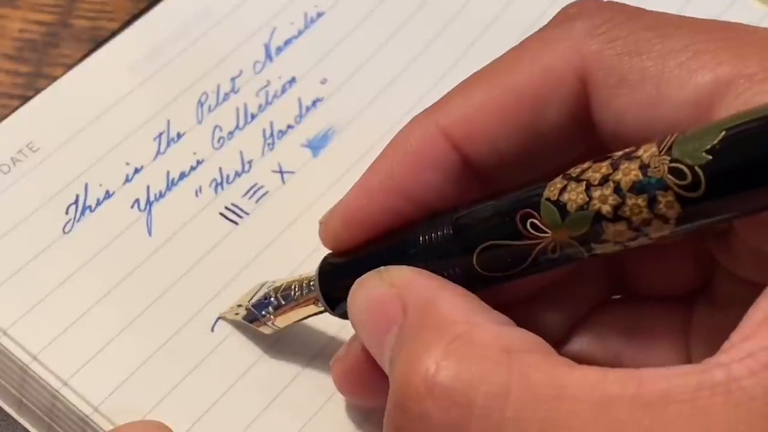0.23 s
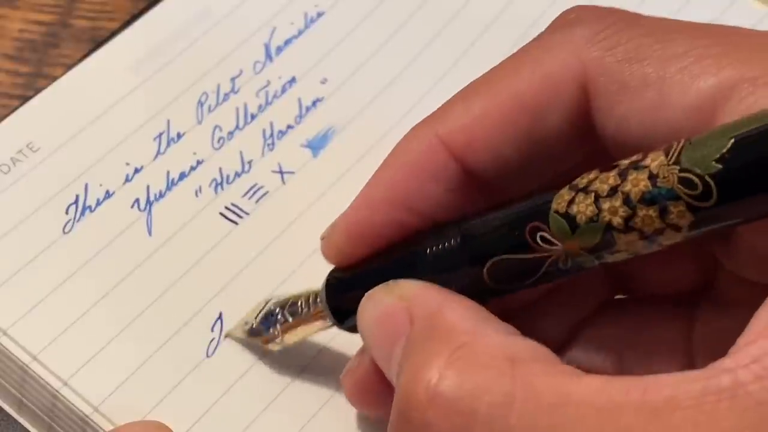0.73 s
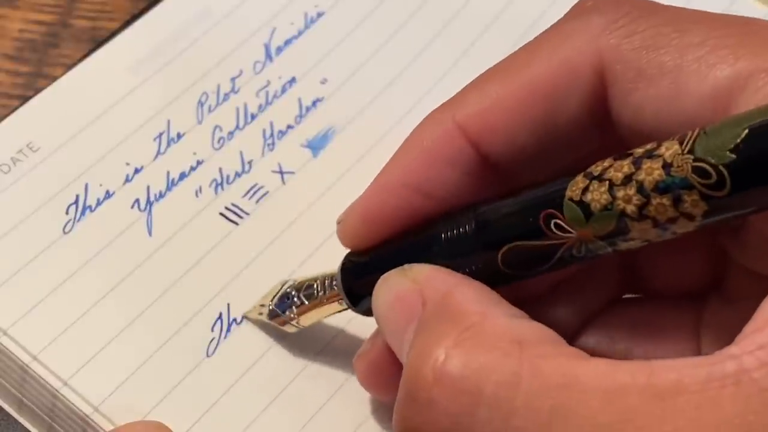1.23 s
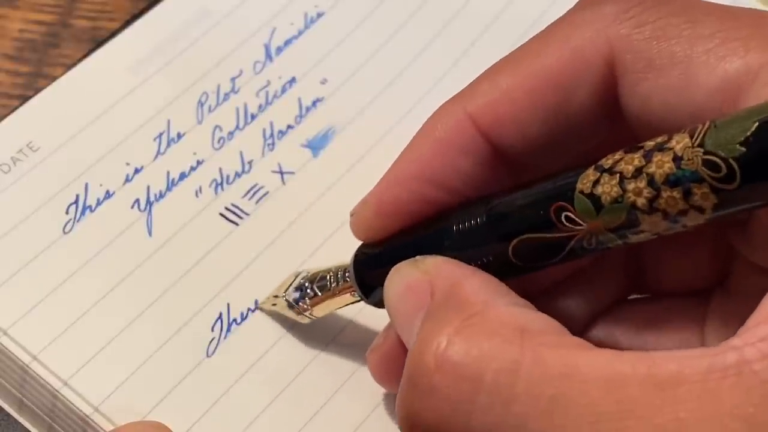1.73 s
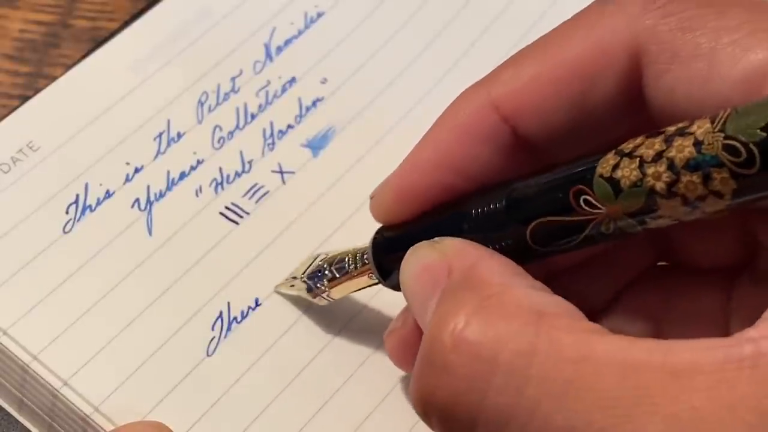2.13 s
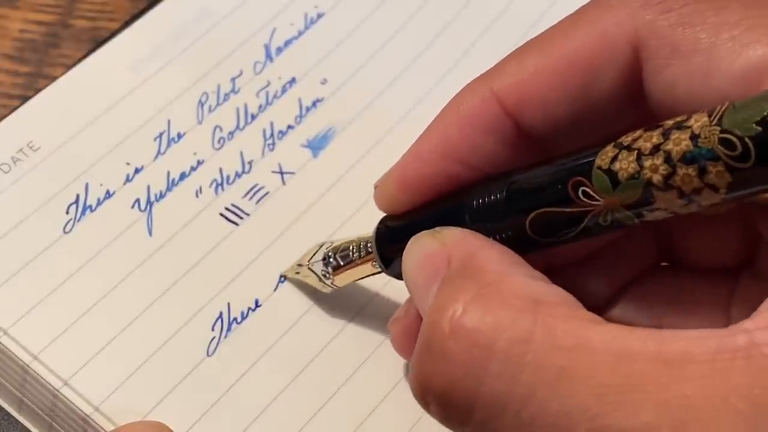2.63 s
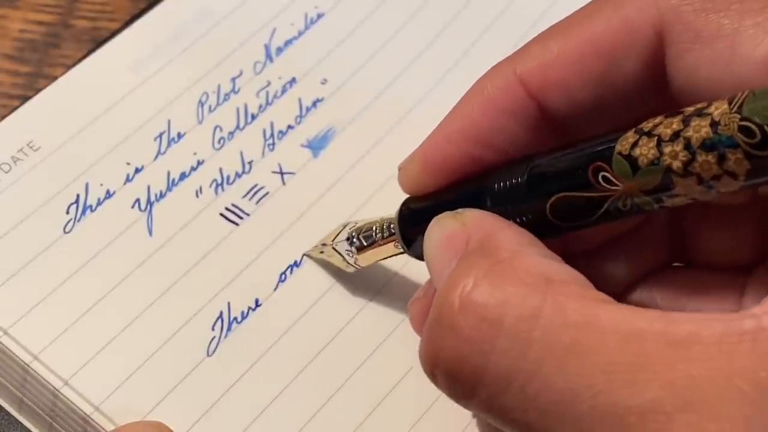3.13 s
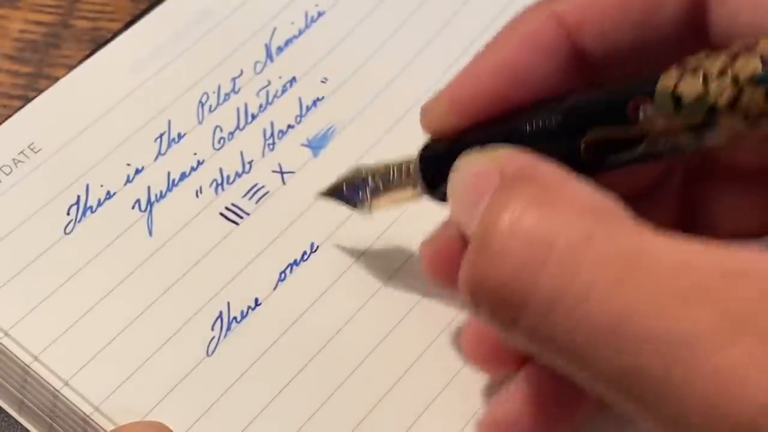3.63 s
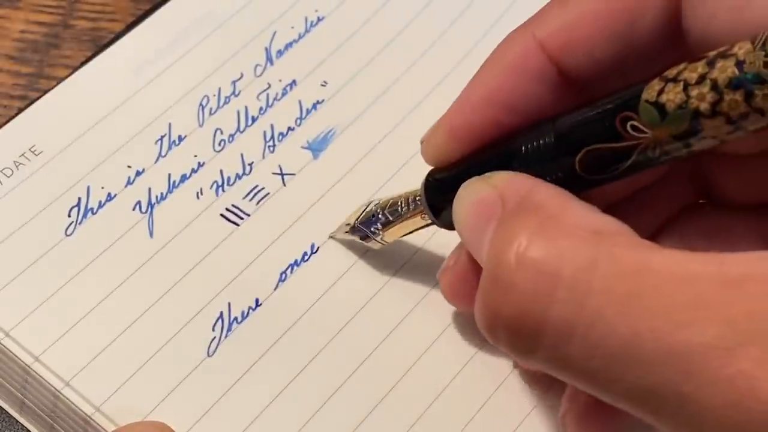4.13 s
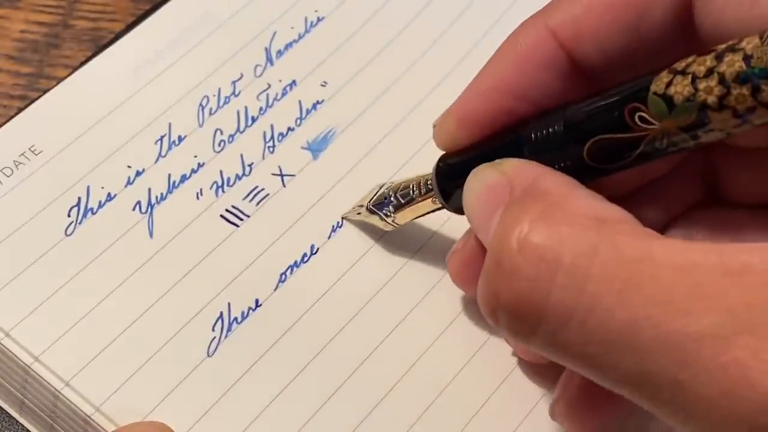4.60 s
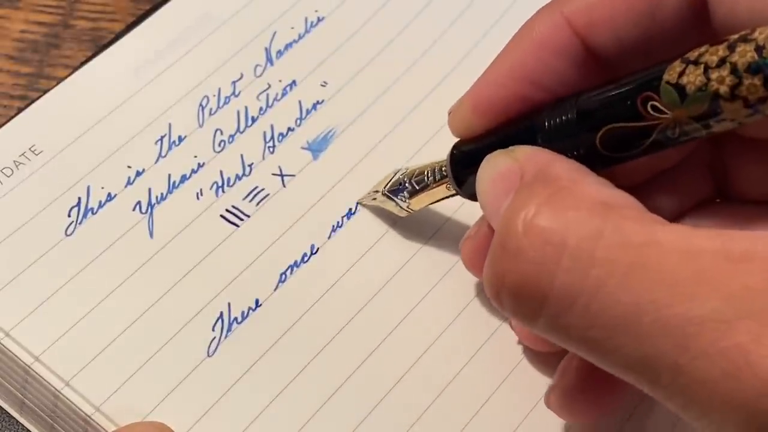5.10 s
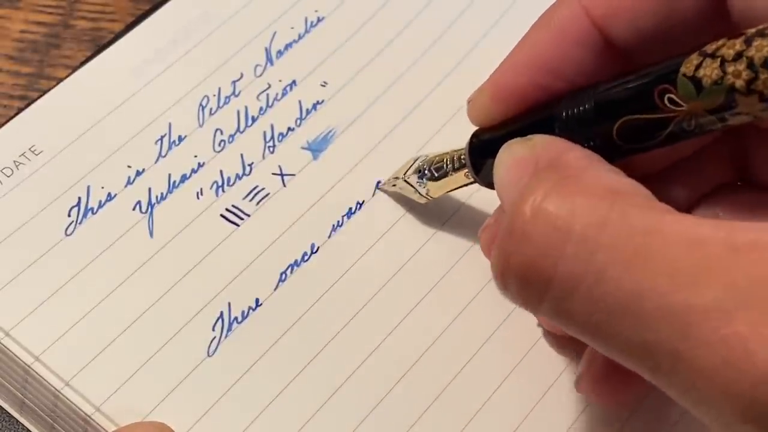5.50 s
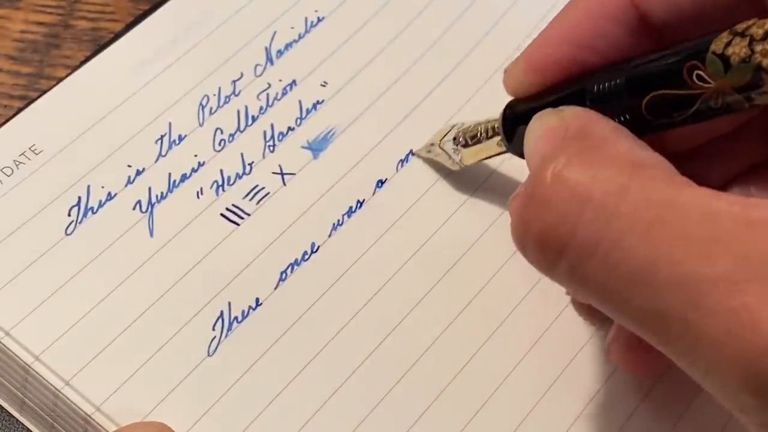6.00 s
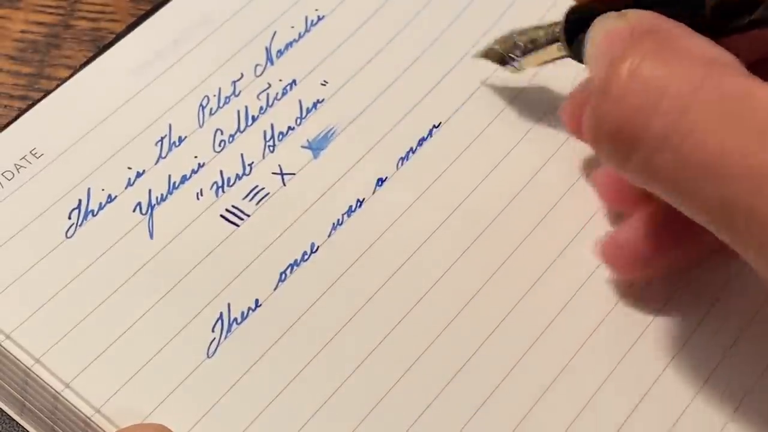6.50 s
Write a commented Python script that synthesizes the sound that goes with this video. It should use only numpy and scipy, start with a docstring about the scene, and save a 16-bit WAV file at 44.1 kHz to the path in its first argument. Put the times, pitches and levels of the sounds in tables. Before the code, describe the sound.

A metal pen nib scratches softly across notebook paper in short strokes over a steady low hum, then briefly dips and continues at double speed.

```python
"""On a desk in a quiet room with a steady hum, a fountain pen writes a line in a notebook.
Each stroke drags the nib over paper fibres: pad and barrel sound low, the nib sings near 5 kHz.
The hand slides over the page in short hisses and knocks softly on the pad; one faint squeak falls in pitch.
Near the end the sound fades for an instant and goes on at double speed, so everything is an octave higher."""
import sys
import numpy as np
from scipy import signal
from scipy.fft import rfft, irfft
from scipy.io import wavfile

SR = 44100
rng = np.random.default_rng(int(sys.argv[2]) if len(sys.argv) > 2 else 0)


def waveform_to_disk(signal):
    """Save audio, clipped to [-1, 1], as 16-bit WAV at the path in sys.argv[1]."""
    frames = np.transpose(np.atleast_2d(signal))
    scaled = np.clip(frames, -1, 1) * 32767
    samples = np.round(scaled).astype(np.int16)
    wavfile.write(sys.argv[1], SR, samples)


N = 297675  # length in samples
TIME = np.arange(N) / SR  # s
FREQ = np.fft.rfftfreq(N, 1 / SR)  # Hz

# In every function, speed is the playing speed: 1 is normal, 2 is double.
# Pitches and widths in the tables are those at normal speed; times are those of the finished sound.


def amp(db):
    """Turns decibels into a gain."""
    return 10 ** (np.asarray(db) / 20)


def unit(x):
    """Scales a signal to an rms level of 1."""
    return x / np.sqrt(np.mean(x ** 2) + 1e-30)


def colour(x, points, speed):
    """Filters by a curve drawn through (Hz, dB) points, moved up by the playing speed."""
    hz, db = np.transpose(points)
    curve_db = np.interp(np.log(FREQ / speed + 1), np.log(hz + 1), db)
    return irfft(rfft(x) * amp(curve_db), N)


def wander(rate_hz):
    """Slow random motion with an rms of 1: noise with its fast part removed."""
    slow = rfft(rng.standard_normal(N)) * np.exp(-(FREQ / rate_hz) ** 2)
    return unit(irfft(slow, N))


def ring(x, modes, speed, bend=1):
    """Sum of steep resonances, rows of (Hz, width Hz, dB); bend is a moving factor on their pitch."""
    out = np.zeros(N)
    clock = np.cumsum(speed * bend * np.ones(N)) / SR
    for hz, width_hz, db in modes:
        turn = np.exp(2j * np.pi * hz * clock)
        r = np.exp(-np.pi * width_hz * speed / SR)
        # shift the pitch down to zero, smooth there, then shift back up
        shifted = x / turn + 1e-18
        smooth = signal.lfilter([(1 - r) ** 2], [1, -2 * r, r * r], shifted)
        out += amp(db) * 2 * (turn * smooth).real
    return out


def arch(middle_s, length_s):
    """Speed of one movement of the hand: it starts, peaks at 1 and stops."""
    times = middle_s + length_s * np.linspace(-.5, .5, 65)
    return np.sqrt(np.interp(TIME, times, np.hanning(65)))


def fibres(speed, per_s, share, patchy_db):
    """Friction force: fine rubbing plus small snags on single fibres, in patches of rougher paper."""
    snags = rng.standard_normal(N) * (rng.random(N) < per_s * speed / SR)
    share = np.clip(share, 0, 1)  # part of the power that comes from snags
    force = np.sqrt(share) * unit(snags) + np.sqrt(1 - share) * rng.standard_normal(N)
    return unit(force * amp(patchy_db * wander(70 * speed)))


def room(speed):
    """Steady beating hum of the mains and of motors just below it, over soft ventilation rumble and hiss."""
    # The hum's tones. Each row: pitch in Hz, rms level in dB.
    hum_tones = [(43, -62), (54.6, -67), (58.6, -67), (87.5, -76), (117.1, -72), (119.96, -49.6),
                 (177, -83), (229.5, -82), (236.8, -70.5), (239.92, -73.5), (254, -84), (295, -86),
                 (414, -88), (473.6, -84), (492.5, -90)]
    # Ventilation noise. Each row: pitch in Hz, level in dB per Hz at normal speed.
    air_curve = [(14, -72), (30, -78.5), (54, -74), (70, -86), (120, -81), (160, -96.5), (235, -92.5),
                 (280, -100), (360, -99), (440, -104.5), (620, -109), (1400, -115.5), (2600, -118.5),
                 (6000, -121), (15500, -124.7)]
    hum = np.zeros(N)
    for hz, db in hum_tones:
        hum += amp(db) * np.sqrt(2) * np.sin(2 * np.pi * (hz * speed * TIME + rng.random()))
    # double speed spreads the same power over twice the band
    air = colour(rng.standard_normal(N), air_curve, speed) * np.sqrt(SR / 2 / speed)
    return hum + air


def squeak():
    """A faint squeak: noise through one narrow resonance that falls in pitch."""
    middle_s, length_s, level_db = 2.02, .17, -88
    middle_hz, fall_hz_per_s, width_hz = 4390, 2200, 110
    hz = middle_hz - fall_hz_per_s * np.clip(TIME - middle_s, -length_s, length_s)
    tone = unit(ring(rng.standard_normal(N), [(1, width_hz, 0)], 1, hz))
    return amp(level_db) * arch(middle_s, length_s) * tone


def knocks(speed):
    """Brief dull blows of pen and hand on the pad, which die at once in the stack of paper."""
    # The blows. Each row: time in seconds, level at the start in dB.
    blow_list = [(.378, -63), (0.683, -70), (3.556, -65), (3.63, -60), (3.695, -50), (3.857, -62.5),
                 (5.224, -70), (5.401, -66), (5.62, -69), (6.265, -64), (6.49, -49.5), (6.668, -64)]
    decay_s = 0.0035  # at normal speed
    dull = [(200, -22), (450, 0), (750, 3), (1800, 0), (2600, -13), (9000, -28)]  # (Hz, dB)
    thud = unit(colour(rng.standard_normal(N), dull, speed))
    blows = np.zeros(N)
    for start_s, db in blow_list:
        blows[round(start_s * SR)] = amp(db)
    return thud * signal.lfilter([1], [1, -np.exp(-speed / (decay_s * SR))], blows)


def hand(speed):
    """The side of the hand brushes along the page: fine friction makes short, smooth hisses."""
    # Slides of the hand. Each row: middle in seconds, length in seconds, level in dB, tilt in dB per octave.
    slides = [(1.814, 0.1, -70.5, -1.5), (1.875, .08, -76, -2.5), (1.91, 0.071, -71.5, -0.7),
              (3.698, 0.16, -61, -0.2), (5.267, 0.064, -69.5, -1.8), (5.658, 0.059, -64.5, -1.5),
              (6.508, 0.087, -57.5, -1.3)]
    # Skin on paper, before the tilt. Each row: pitch in Hz, relative level in dB.
    skin_curve = [(200, 6), (400, 3), (800, 0), (1100, 1.5), (1600, 3.5), (2600, 1), (4000, 4), (6500, 3.5),
                  (8000, -1.5), (11000, -3.5), (13000, -9), (16000, -21)]
    rub = fibres(speed, per_s=3000, share=.3, patchy_db=.6)
    out = np.zeros(N)
    for middle_s, length_s, db, tilt_db in slides:
        tilted = [(hz, level + tilt_db * np.log2(hz)) for hz, level in skin_curve]
        hiss = unit(colour(rub, tilted, speed))
        out += amp(db) * arch(middle_s, length_s) ** 1.2 * hiss
    return out


def glide(speed):
    """Light, wavering drag that joins the strokes for as long as the nib stays on the paper."""
    # Words, with the nib on the paper throughout. Each row: pen down in seconds, pen up in seconds.
    words = [(.08, .56), (.73, 1.79), (2.32, 3.6), (4.17, 5.14), (5.39, 5.64), (5.77, 6.2)]
    level_db, waver_db = -93, 4
    waver_hz, landing_s = 6.6, 0.024  # at normal speed
    contact = np.zeros(N)
    for down_s, up_s in words:
        nearest_end_s = np.minimum(TIME - down_s, up_s - TIME)
        contact += np.clip(nearest_end_s * speed / landing_s, 0, 1)
    return contact * amp(level_db + waver_db * wander(waver_hz * speed))


def small_strokes(speed):
    """Fills each run of small letters with down- and upstrokes in an even beat; downstrokes lean on the pad."""
    # Runs of letters. Each row: first stroke in seconds, last stroke in seconds, drag in dB before unevenness.
    runs = [(1.056, 1.349, -85.5), (2.468, 2.53, -80.5), (2.894, 3.1, -84), (3.314, 3.502, -79.5),
            (4.806, 4.883, -79), (4.976, 5.057, -81), (5.519, 5.629, -80), (5.789, 5.916, -77),
            (5.966, 6.046, -77), (6.147, 6.201, -81), (6.274, 6.369, -78.5)]
    beat_s, stroke_s = .088, 0.07  # rough time between strokes and length of one, at normal speed
    down_pad_db, up_pad_db, up_drag_db, uneven_db = 7, 5.5, 0.2, 1.5
    rows = []
    for first_s, last_s, drag_db in runs:
        beats = max(round((last_s - first_s) * speed / beat_s), 1)
        for k, middle_s in enumerate(np.linspace(first_s, last_s, beats + 1)):
            extra_db, pad_db = (up_drag_db, up_pad_db) if k % 2 else (0, down_pad_db)
            stroke_db = drag_db + extra_db + uneven_db * rng.standard_normal()
            rows.append((middle_s, stroke_s / speed, stroke_db, pad_db))
    return rows


def pen(speed):
    """Friction drives pad, barrel and nib; the barrel's pitch shifts as the grip changes."""
    # Bold strokes of capitals, loops and first letters. Each row: middle in seconds, length in seconds,
    # drag in dB, weight on the pad in dB relative to the drag.
    bold_strokes = [(0.12, .093, -79.5, -3), (0.384, 0.057, -69, 3), (0.425, 0.088, -66.5, -4),
                    (0.495, 0.074, -71, 5.5), (0.787, .1, -70, 9), (0.929, .09, -70.5, 3),
                    (1.418, 0.073, -77.5, 4.5), (1.634, 0.085, -77, 0), (1.73, 0.067, -81.5, 2),
                    (2.37, 0.096, -76, 9.5), (2.7, 0.067, -78, 9), (3.38, 0.07, -74.5, 10.5),
                    (3.56, 0.053, -75, 8.5), (4.244, 0.069, -75.5, 9), (4.414, 0.069, -79.5, 8),
                    (4.546, .11, -80.5, 9), (4.68, .11, -81, 9), (5.23, .032, -76.5, 13.5),
                    (5.411, .043, -74, 10), (6.443, 0.099, -79.5, -3), (6.684, 0.059, -69, 9.5),
                    (6.699, 0.04, -65.5, 1), (6.751, .049, -57, -13)]
    # The pad's note depends on where the nib presses. Each row: time in seconds, pitch in Hz.
    pad_notes = [(0, 514), (.39, 580), (.48, 470), (.92, 502), (2.38, 420), (3.39, 484), (4.25, 455),
                 (6.75, 462)]
    # Resonances of the barrel. Each row: pitch in Hz, width in Hz, relative level in dB.
    barrel_modes = [(630, 160, -3.5), (1038, 160, -3), (1332, 234, 0), (1857, 290, -3.5), (2423, 180, -9),
                    (2990, 500, -17.5)]
    # Resonances of the nib. Each row: pitch in Hz, width in Hz, relative level in dB.
    nib_modes = [(4270, 700, -2), (4910, 600, 2), (5000, 200, -1.5), (6640, 1100, -17.5), (8350, 820, -8)]
    # Dry friction of nib on paper. Each row: pitch in Hz, relative level in dB.
    friction_curve = [(150, -22), (300, 2), (600, 2), (1500, -9), (3000, -8), (6000, -12), (10000, -22),
                      (16000, -27)]
    pad_db, dry_db, nib_db = 0.85, -4, 0.8  # levels of the layers beside the barrel's 0 dB
    glide_pad_db, glide_ring_db = 3.5, 1  # pad and nib while gliding, relative to the drag
    ring_db, firm_db = -7.5, -75.5  # nib relative to a firm drag, and that drag
    ring_growth = 0.99  # dB of nib ring per dB of drag

    # three powers over time: drag moves barrel and paper, weight the pad, sing the nib
    drag = glide(speed) ** 2
    weight = drag * amp(glide_pad_db) ** 2
    sing = drag * amp(glide_ring_db) ** 2
    for middle_s, length_s, drag_db, weight_db in bold_strokes + small_strokes(speed):
        power = (amp(drag_db) * arch(middle_s, length_s)) ** 2
        drag += power
        weight += power * amp(weight_db) ** 2
        sing += power * amp(ring_db + (ring_growth - 1) * (drag_db - firm_db)) ** 2

    force = fibres(speed, per_s=500, share=.55, patchy_db=1.8)
    note_hz = np.interp(TIME, *np.transpose(pad_notes))
    # a resonance at 1 Hz, 185 Hz wide, bent up to the moving note
    pad = amp(pad_db) * unit(ring(force, [(1, 185, 0)], speed, note_hz))
    grip = 1 + .015 * wander(4 * speed)
    barrel = unit(ring(force, barrel_modes, speed, grip))
    scratch = fibres(speed, per_s=900, share=0.42, patchy_db=1.5)
    dry_rub = amp(dry_db) * unit(colour(scratch, friction_curve, speed))
    nib = amp(nib_db) * unit(ring(force, nib_modes, speed))
    return np.sqrt(weight) * pad + np.sqrt(drag) * (barrel + dry_rub) + np.sqrt(sing) * nib


def desk(speed):
    """Adds up room, knocks, hand and pen at one playing speed."""
    return room(speed) + knocks(speed) + hand(speed) + pen(speed)


def scene():
    """Normal speed, with the squeak, fades out; then double speed fades in."""
    speed_up_s, fade_s = 5.172, .048  # moment of silence, and length of the fade on each side
    fade = np.clip((TIME - speed_up_s) / fade_s, -1, 1)
    gain = np.sin(np.pi / 2 * abs(fade)) ** 2
    normal = desk(1) + squeak()
    double = desk(2)
    return (gain * np.where(fade < 0, normal, double))[None]


def record(dry):
    """Removes everything above the band limit with a steep low-pass filter."""
    edge_hz = 15720
    low_pass = signal.firwin(1023, edge_hz, window=("kaiser", 9), fs=SR)
    return signal.oaconvolve(dry, low_pass[None], "same")


dry = scene()
out = record(dry)
waveform_to_disk(out)
```